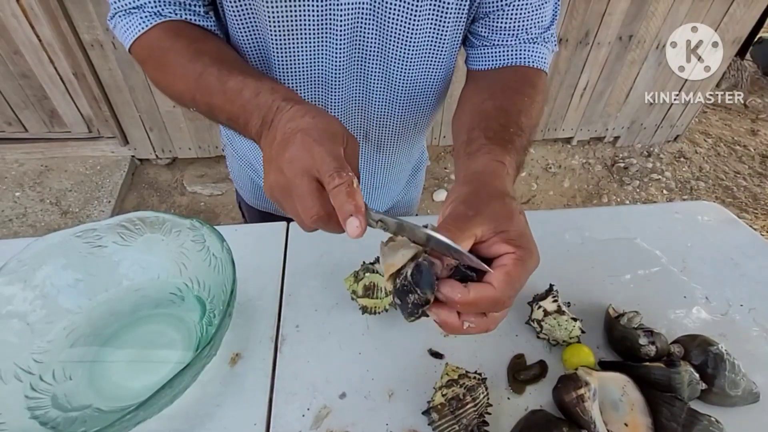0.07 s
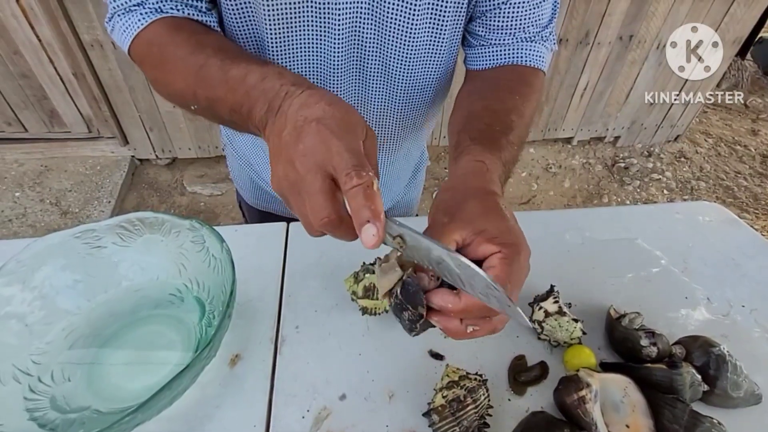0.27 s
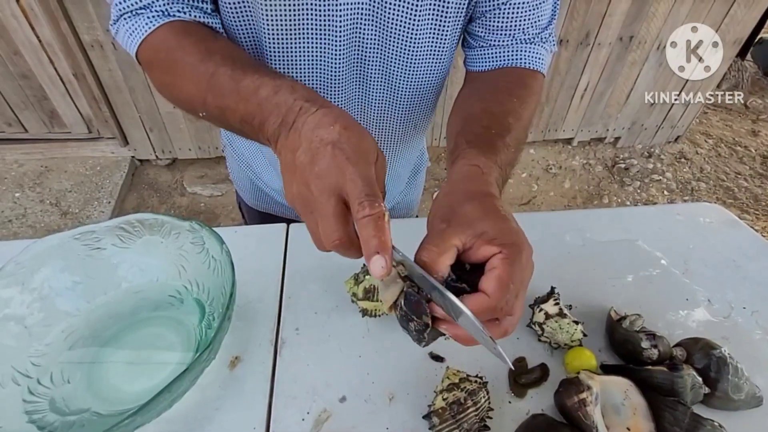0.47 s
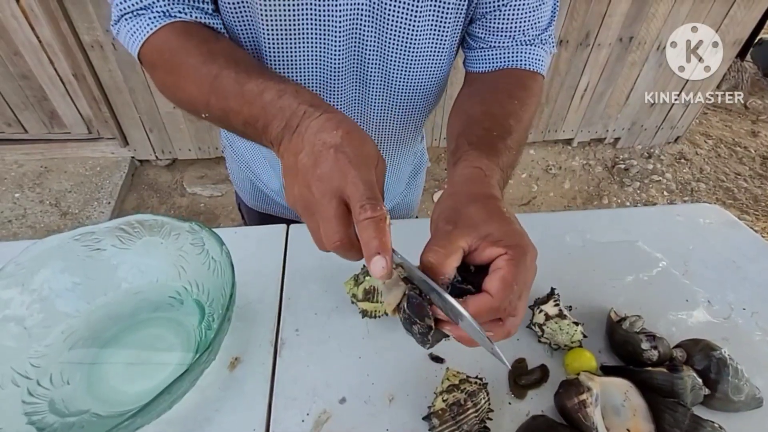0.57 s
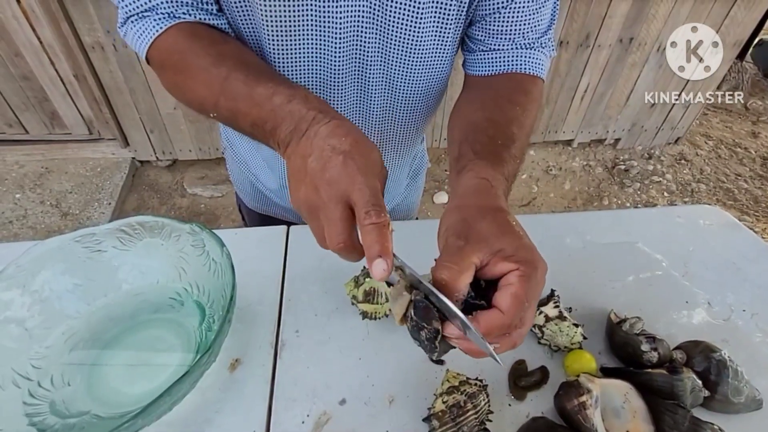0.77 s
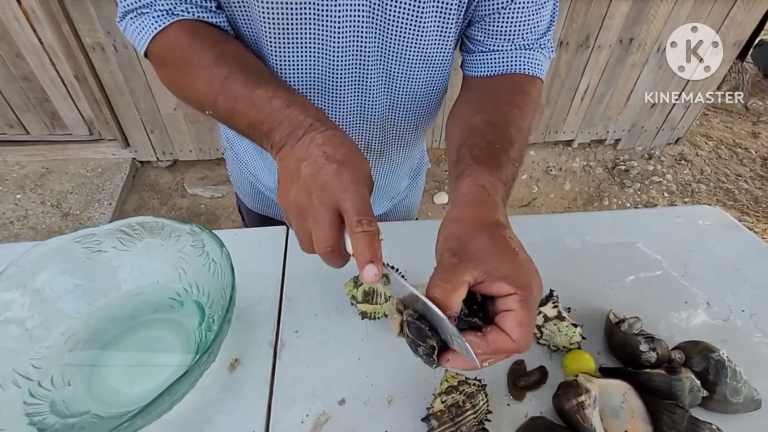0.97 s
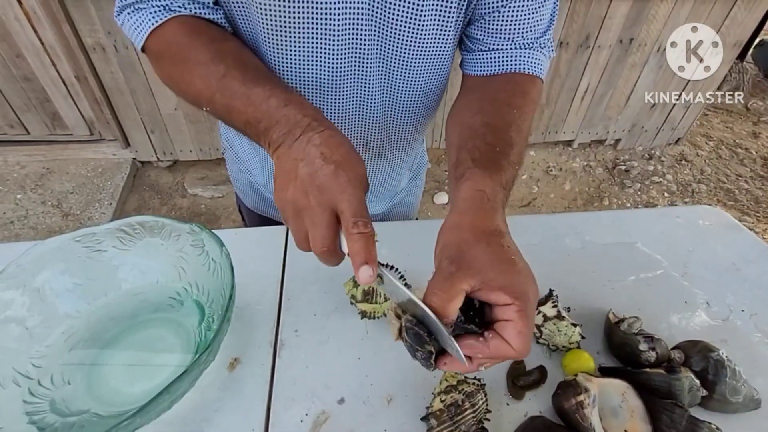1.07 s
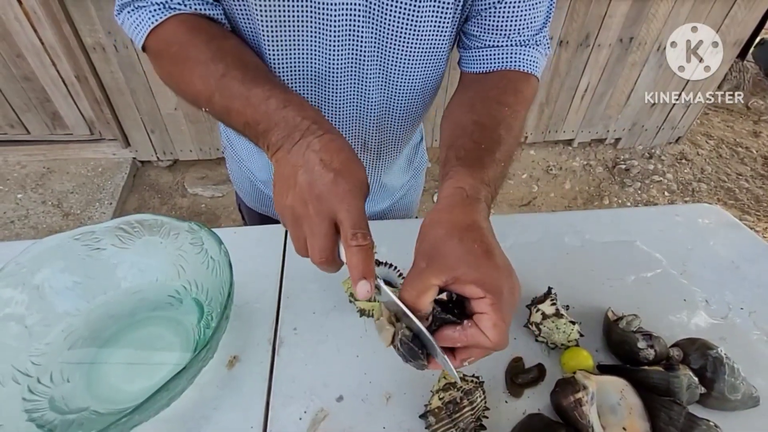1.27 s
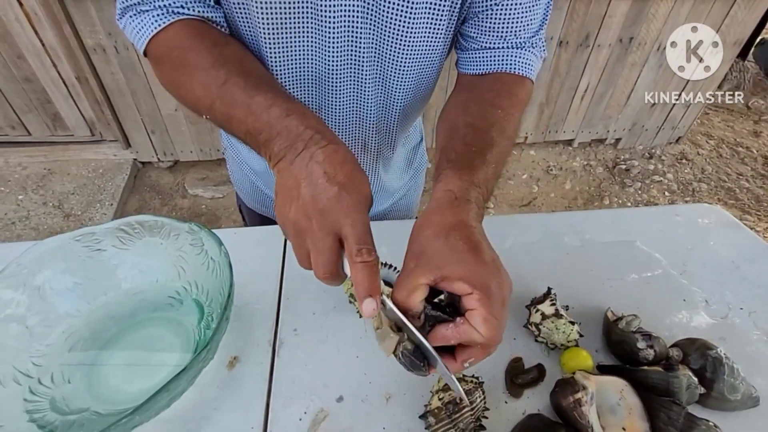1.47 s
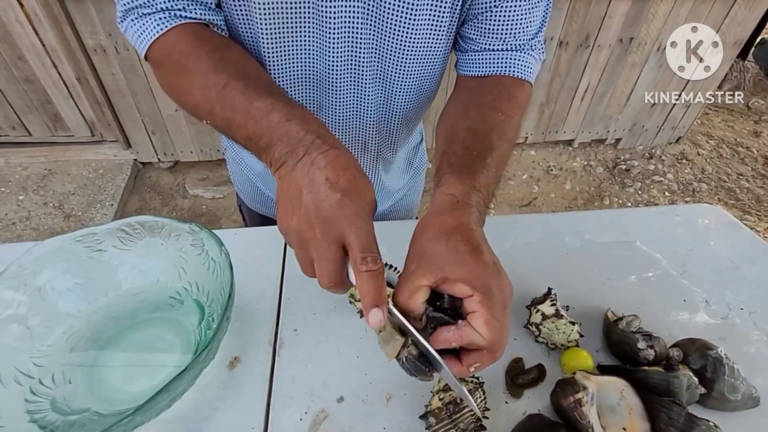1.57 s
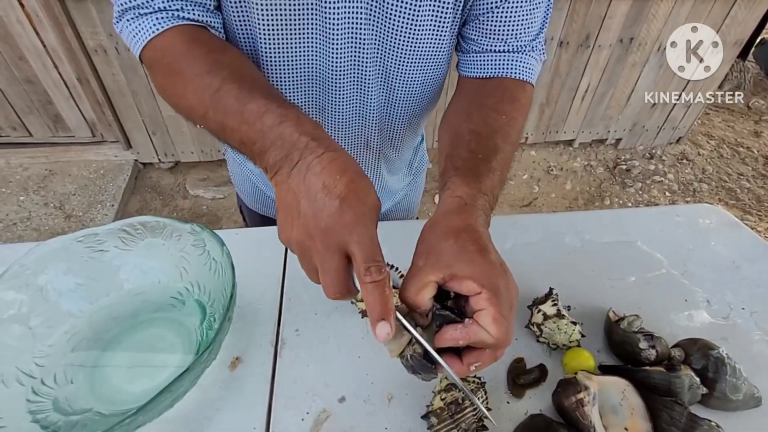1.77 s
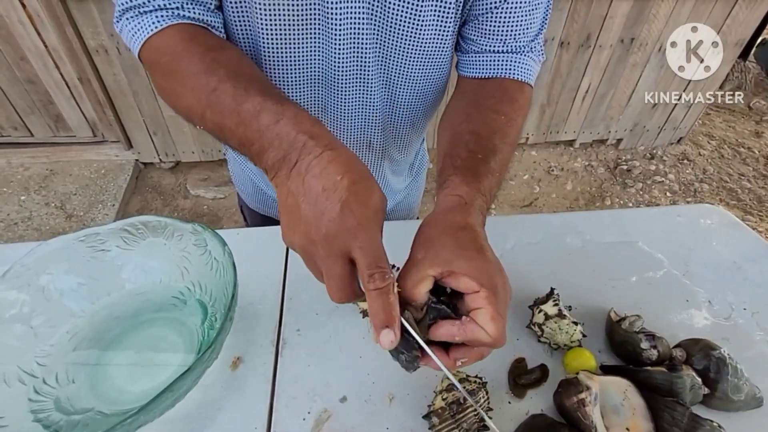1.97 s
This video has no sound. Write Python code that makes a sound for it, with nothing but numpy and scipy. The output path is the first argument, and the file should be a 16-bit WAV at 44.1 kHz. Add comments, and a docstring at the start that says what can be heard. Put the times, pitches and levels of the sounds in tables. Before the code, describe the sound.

A knife scrapes wet flesh in a shell with tiny crackles, then a sharp double snap near the end; two distant shovel-like gritty strokes, low wind thumps mainly on the right, quiet open yard.

```python
"""A knife picks at a cooked shellfish outdoors: noise bursts ring shell resonances, with one sharp double snap.
Further off, two gritty noise strokes, probably a shovel biting into sand, are each followed by softer spills.
Smoothed-out rumble and short suction pulses are wind on the microphone, mostly at its right port.
A small bird chirps three gliding tones and faint dull knocks sound, over the steady noise of a quiet yard."""
import sys
import numpy as np
from scipy import signal
from scipy.fft import rfft, irfft
from scipy.io import wavfile
from scipy.ndimage import uniform_filter1d

SR = 44100
rng = np.random.default_rng(int(sys.argv[2]) if len(sys.argv) > 2 else 0)


def unload_wav(signal):
    """Save mono or channel-first audio to the path in sys.argv[1] as 16-bit WAV at rate SR, clipped to [-1, 1]."""
    wavfile.write(
        sys.argv[1],
        SR,
        np.round(np.clip(np.atleast_2d(signal).T, -1, 1) * 32767).astype(np.int16),
    )


N = 88905
T = np.arange(N) / SR  # time, s
HZ = np.maximum(np.fft.rfftfreq(N, 1 / SR), 1)  # frequency of each spectrum bin


def amp(db):
    """Decibels to gain."""
    return 10 ** (np.asarray(db) / 20)


def unit(x):
    """Scale to rms 1 over all samples and ports."""
    return x / np.sqrt(np.mean(x ** 2))


def shape(x, response):
    """Filter by a frequency response."""
    return irfft(rfft(x) * response, N)


def colour(points):
    """Response drawn through (freq_hz, gain_db) points, on a log frequency axis."""
    freq_hz, gain_db = np.array(points, float).T
    return amp(np.interp(np.log(HZ), np.log(freq_hz), gain_db))


def resonances(rows):
    """Response of parallel resonators (pitch_hz, width_hz, level_db), scaled together to unit power."""
    response = sum(amp(db) / (1 + 1j * (HZ ** 2 - pitch ** 2) / (HZ * width)) for pitch, width, db in rows)
    return response / np.sqrt(np.mean(abs(response) ** 2))


def low_cut(hz):
    """Steep high-pass response."""
    return 1 / np.sqrt(1 + (hz / HZ) ** 8)


def tilt(db_per_octave):
    """Treble slope pivoting at 2500 Hz, flat below 500 Hz."""
    return amp(db_per_octave * np.log2(np.maximum(HZ, 500) / 2500))


def grit(grain):
    """Dense tiny impacts, more uneven in size as grain rises, unrelated at the two ports."""
    impacts = rng.standard_normal((2, N))
    return unit(impacts * np.exp(grain * rng.standard_normal((2, N))))


def envelope(start, attack, hold, fall):
    """Linear attack, hold, exponential release."""
    release = np.exp(-np.maximum(T - start - attack - hold, 0) / fall)
    return np.clip((T - start) / attack, 0, 1) * release


FLUTTER_S = 0.018  # larger is slower


def flutter(db):
    """Quick random swings of level, of this rms in dB, different at each port."""
    swings = shape(rng.standard_normal((2, N)), np.exp(-(HZ * FLUTTER_S) ** 2))
    return amp(db * unit(swings))


# Resonances of the thin shell edge: pitch_hz, width_hz, level_db, left_minus_right_db
EDGE_MODES = [(4940, 380, -19, 13), (8090, 260, 1, 4.5), (11060, 320, 3, -13), (12100, 1300, 0, 6),
              (14100, 460, -10, -3)]


def edge_response():
    """Each resonance of the thin edge radiates more to one side."""
    ports = []
    for side in (1, -1):
        ports.append(resonances([(hz, width, db + side * lean_db / 2) for hz, width, db, lean_db in EDGE_MODES]))
    return np.array(ports)


# Runs of shell fractures: start_s, level_db, length_s, body_over_edge_db
CRACKLES = [(0.0215, -74, 0.015, 10), (0.0524, -49, 0.0072, -3.5), (0.066, -66, 0.0044, -1.5),
            (0.103, -60.5, 0.0043, -11), (.2345, -56, 0.0016, -27), (.617, -60, 0.0017, -21),
            (1.192, -70, 0.0021, -13), (1.2387, -52.5, 0.00053, -5), (1.69, -57, .007, -24),
            (1.696, -48, 0.0011, -28), (1.7728, -59, 0.0032, -4), (1.816, -30, 0.0023, -11),
            (1.819, -51, .003, 7), (1.8272, -52.5, 0.0017, 14), (1.877, -72, 0.012, 7.5),
            (1.9135, -62, 0.0023, -14), (1.9313, -67.5, 0.0056, -0.5), (1.9825, -59, .002, -19),
            (1.991, -62, 0.0063, -31)]
# Resonances of the shell body: pitch_hz, width_hz, level_db
BODY_MODES = [(596, 230, 4.5), (1840, 490, 6), (3250, 290, -1), (4340, 1000, -0.5), (6800, 2400, -1)]
# Spells of scraping in the flesh: start_s, end_s, level_over_flesh_db
SPELLS = [(0., 0.237, 8.5), (1.11, 1.308, 0), (1.727, 1.997, -4)]
# Tone of the wet flesh: freq_hz, gain_db
FLESH_COLOUR = [(300, 16), (900, -3.5), (2000, -3), (2800, -11), (4100, -8), (5300, -8), (8000, 0),
                (9300, -1.5), (11500, -2.5), (15500, -7.5)]
CRACKLE_FALL_SHARE = 0.61  # release time over run length
CRACKLE_GRAIN, CRACKLE_APART = 1, 2.06  # unevenness; per-port part against the shared part
CRACKLE_ROOM_DB, CRACKLE_ROOM_S = -24, 0.031  # short tail: level, decay time
FLESH_DB, FLESH_TICKS_PER_S = -78, 250


def knife():
    """Runs of tiny fractures ring the edge and body of the shell; wet flesh rubs and ticks in spells."""
    edge, body = np.zeros(N), np.zeros(N)
    for start, db, length, body_db in CRACKLES:
        push = amp(db) * envelope(start, length / 2, length / 2, length * CRACKLE_FALL_SHARE)
        edge += push
        body += push * amp(body_db)
    fractures = unit(grit(CRACKLE_GRAIN)[0] + CRACKLE_APART * grit(CRACKLE_GRAIN))
    shell_edge = shape(fractures * edge, edge_response() * low_cut(2700))
    shell_body = shape(fractures * body, resonances(BODY_MODES) * low_cut(350))

    ticks = (rng.random(N) < FLESH_TICKS_PER_S / SR) * rng.standard_normal((2, N))
    rub = grit(CRACKLE_GRAIN)
    effort = sum(amp(db) * envelope(start, 0.0042, end - start, 0.018) for start, end, db in SPELLS)
    flesh = unit(shape(0.47 * unit(ticks) + rub, colour(FLESH_COLOUR) * low_cut(350)))

    close = amp(FLESH_DB) * effort * flesh + shell_edge + shell_body
    # a decaying noise tail of unit energy
    tail = unit(rng.standard_normal((2, N)) * np.exp(-T / CRACKLE_ROOM_S)) / np.sqrt(N)
    return close + amp(CRACKLE_ROOM_DB) * shape(close, rfft(tail))


def rumble(points):
    """Noise of a given colour with its slow swings evened out."""
    noise = shape(rng.standard_normal(N), colour(points))
    power = uniform_filter1d(noise ** 2, int(.035 * SR))
    return noise / np.sqrt(power + 1e-18)


# Gust strength, before the offsets of each layer: time_s, gust_db
GUSTS = [(0.0, -42.5), (0.19, -35.5), (0.22, -55), (0.26, -46.5), (0.3, -75), (0.37, -40), (0.43, -51.5),
         (0.55, -52), (0.57, -34.5), (0.64, -55), (0.67, -39.5), (0.71, -53.5), (0.8, -42.5), (0.83, -59),
         (0.89, -43), (0.94, -59), (0.98, -40.5), (1.08, -70), (1.15, -66), (1.22, -25), (1.26, -35.5),
         (1.32, -33), (1.4, -60), (1.44, -40.5), (1.48, -69), (1.51, -28.5), (1.54, -24), (1.6, -34.5),
         (1.63, -24.5), (1.64, -23), (1.66, -40), (1.69, -20), (1.83, -36), (1.86, -47), (1.9, -37),
         (2.02, -64)]
# Tone of the low rumble: freq_hz, gain_db
WIND_COLOUR = [(20, -35), (40, -6.5), (60, 3), (90, -11.5), (130, -12), (200, -47), (300, -34), (600, -82),
               (1500, -81.5)]
# Tone of the rougher turbulence: freq_hz, gain_db
TURBULENCE_COLOUR = [(60, -37), (130, 11), (250, 0.5), (400, -16.5), (700, -26), (1500, -45.5), (4000, -80)]
WIND_DB = 5.5  # right rumble over the gust strength
LEE_DB, LEE_FOLLOW = -20, 0.63  # left rumble: offset, dB per dB of gust
TURBULENCE_DB, TURBULENCE_GROWTH = 1, 1.38  # offset, dB per dB of gust


def wind():
    """Gusts rumble on the right port and roughen when strong; the left port lies in the lee."""
    gust_db = np.interp(T, *np.array(GUSTS).T)
    right = amp(gust_db + WIND_DB) * rumble(WIND_COLOUR)
    right += amp(TURBULENCE_DB + TURBULENCE_GROWTH * gust_db) * rumble(TURBULENCE_COLOUR)
    left = amp(LEE_DB + LEE_FOLLOW * gust_db) * rumble(WIND_COLOUR)
    return np.array([left, right])


# Tone of the yard air: freq_hz, gain_db
YARD_COLOUR = [(130, 0.5), (250, 6.5), (400, -8), (600, -7), (1000, -11.5), (1400, -17), (2000, -16),
               (2600, -20), (3300, -18), (4050, -13), (5200, -25), (7800, -15.5), (9300, -22), (11500, -18),
               (15500, -39)]
YARD_DB, YARD_LEFT_DB = -70, 1.5  # base level, extra at the left port


def yard():
    """Faint even outdoor air: steady coloured noise, unrelated at the two ports."""
    air = unit(shape(rng.standard_normal((2, N)), colour(YARD_COLOUR) * low_cut(120)))
    return amp(YARD_DB) * air * amp([[YARD_LEFT_DB], [0]])


# Eddies hitting a port: time_s, pressure_db (before the bass cut), width_s, port (0 left, 1 right)
BUFFETS = [(.107, -20.5, 0.0049, 0), (0.114, -17.5, 0.0037, 1), (0.1526, -13.5, 0.0025, 1),
           (0.196, -28, 0.0026, 1), (0.566, -28, 0.0019, 1), (0.589, -22.5, 0.0069, 0),
           (.778, -40, 0.0019, 1), (0.874, -24.5, 0.0035, 1), (0.967, -18.5, 0.0073, 1),
           (1.2234, -15.5, 0.0018, 1), (1.538, -9.5, 0.0019, 1), (1.572, -11, 0.002, 1),
           (1.618, -11, 0.0014, 1), (1.6252, -9, 0.0027, 1), (1.64, -7.5, 0.0019, 1),
           (1.6932, 0, 0.0015, 1), (1.71, -9, 0.0018, 1)]
PORT_HZ, PORT_WIDTH_HZ = 59.3, 65.6  # corner and damping of the bass cut


def buffets():
    """Each eddy is a brief suction; the bass cut of the microphone makes it swing back."""
    pressure = np.zeros((2, N))
    for time, db, width, port in BUFFETS:
        pressure[int(round(port))] -= amp(db) / np.cosh(np.clip(2 * (T - time) / width, -50, 50))
    bass_cut = HZ ** 2 / (HZ ** 2 - PORT_HZ ** 2 - 1j * HZ * PORT_WIDTH_HZ)
    return shape(pressure, bass_cut)


# Chirp notes: start_s, length_s, start_hz, end_hz, peak_db (before the lean to the left)
CHIRPS = [(0.343, 0.03, 5030, 4800, -69), (0.367, .013, 4280, 4300, -67.5), (0.386, 0.045, 4030, 4300, -69)]
CHIRP_WAVER_HZ = 89  # rms pitch waver


def bird():
    """Three thin gliding sines of wavering pitch, slightly to the left."""
    notes = np.zeros(N)
    waver = CHIRP_WAVER_HZ * unit(uniform_filter1d(rng.standard_normal(N), size=40))
    for start, length, from_hz, to_hz, db in CHIRPS:
        progress = np.clip((T - start) / length, 0, 1)
        pitch_hz = from_hz + (to_hz - from_hz) * progress + waver
        notes += amp(db) * np.sin(np.pi * progress) * np.sin(2 * np.pi * np.cumsum(pitch_hz) / SR)
    return notes * amp([[2], [-2]])


# Strokes: start_s, level_db, attack_s, hold_s, fall_s, tilt_db_per_octave, blade_over_rasp_db, ring_db
STROKES = [(0.432, -39, 0.013, 0.023, 0.032, 0.4, -9, -41.5),
           (1.304, -43, 0.0044, .036, 0.025, -0.5, -3.5, -48)]
# Tone of the rasp: freq_hz, gain_db
STROKE_COLOUR = [(310, -9), (520, -2), (710, -3), (870, -6), (1090, -2.5), (1310, -12.5), (1650, 1.5),
                 (2400, 1), (2850, -6), (4400, -5), (5700, -10.5), (7600, -5.5), (9000, -13), (11000, -10),
                 (15500, -17.5)]
# Resonances of the blade, also heard in the spills: pitch_hz, width_hz, level_db
BLADE_MODES = [(2110, 120, -12), (1996, 56, -14.5), (2525, 26, -18.5)]
# Resonances of the hollow sound: pitch_hz, width_hz, level_db
HOLLOW_MODES = [(204, 89, -1), (288, 27, -3.5), (690, 52, -8)]
STROKE_GRAIN, STROKE_LOW_HZ = 0.69, 227  # unevenness, low cut (shared with the spills)
BLADE_APART, HOLLOW_DB = 1, -7  # per-port against shared grit; hollow level over rasp
ECHO_DB, ECHO_FALL_S = -20.5, 0.11
RING_HZ, RING_WIDTH_HZ, RING_FLUTTER_DB = 391, 6.1, 2  # note, blur by phase wander, rms level swing
RING_BUILD_S, RING_FALL_S = 0.027, 0.026


def strokes():
    """Grit rasps on a blade while a hollow note builds; a slower faint fade gives the echo of the yard."""
    out = np.zeros((2, N))
    for start, db, attack, hold, fall, tilt_db, blade_db, ring_db in STROKES:
        rasp_tone = colour(STROKE_COLOUR) * tilt(tilt_db) * low_cut(STROKE_LOW_HZ)
        rasp = unit(shape(grit(STROKE_GRAIN), rasp_tone))
        blade_grit = grit(STROKE_GRAIN)[0] + BLADE_APART * grit(STROKE_GRAIN)
        blade = unit(shape(blade_grit, resonances(BLADE_MODES) * low_cut(1450)))
        hollow = unit(shape(grit(STROKE_GRAIN), resonances(HOLLOW_MODES) * low_cut(150)))
        scrape = rasp + amp(blade_db) * blade + amp(HOLLOW_DB) * hollow
        # the echo adds in power to each envelope
        echo = amp(ECHO_DB) * envelope(start, 0.069, hold, ECHO_FALL_S)
        out += amp(db) * scrape * np.hypot(envelope(start, attack, hold, fall), echo)

        wander = np.cumsum(rng.standard_normal(N)) * np.sqrt(2 * np.pi * RING_WIDTH_HZ / SR)
        ring = unit(np.sin(2 * np.pi * RING_HZ * T + wander) * flutter(RING_FLUTTER_DB))
        out += amp(ring_db) * ring * np.hypot(envelope(start, RING_BUILD_S, hold, RING_FALL_S), echo)
    return out


# Spills: peak_s, level_db (before flutter), rise_s, fall_s, tilt_db_per_octave
SPILLS = [(.67, -65.5, 0.017, 0.11, 4.5), (0.729, -58, 0.049, 0.048, -1.5), (0.866, -64, 0.034, 0.075, -1),
          (1.44, -56.5, 0.029, 0.068, 1), (1.576, -48, 0.031, 0.043, 0.76), (1.8, -58, 0.047, 0.035, 3)]
# Tone of the sliding grains: freq_hz, gain_db
SPILL_COLOUR = [(300, 7.5), (650, 4), (1150, -4.5), (1650, 0.5), (2200, -1), (3000, -7.5), (4500, -10.5),
                (5700, -15.5), (7800, -13.5), (9500, -16.5), (11800, -14), (15500, -23.5)]
SPILL_GRAIN, SPILL_BLADE_DB, SPILL_FLUTTER_DB = 0.48, -14.5, 2  # unevenness, blade over grains, rms swing


def spills():
    """Loose grains slide unevenly off the blade in soft swells after each stroke."""
    out = np.zeros((2, N))
    for peak, db, rise, fall, tilt_db in SPILLS:
        swell = 1 / np.cosh((T - peak) / np.where(T < peak, rise, fall))
        grain_tone = colour(SPILL_COLOUR) * tilt(tilt_db) * low_cut(STROKE_LOW_HZ)
        grains = unit(shape(grit(SPILL_GRAIN), grain_tone))
        blade = unit(shape(grit(SPILL_GRAIN), resonances(BLADE_MODES) * low_cut(1300)))
        out += amp(db) * swell * (grains + amp(SPILL_BLADE_DB) * blade)
    return out * flutter(SPILL_FLUTTER_DB)


# Faint dull knocks, perhaps shells shifting on the table: start_s, level_db, pitch_hz
KNOCKS = [(1.02, -59.5, 375), (1.996, -69, 500)]
KNOCK_WIDTH_HZ, KNOCK_PUSH_S, KNOCK_FALL_S = 87, 0.0081, 0.03


def knocks():
    """Soft contacts: a swell of noise through one damped resonance, applied twice for a narrower tone."""
    out = np.zeros((2, N))
    for start, db, pitch_hz in KNOCKS:
        thud = unit(shape(grit(0), resonances([(pitch_hz, KNOCK_WIDTH_HZ, 0)]) ** 2))
        out += amp(db) * envelope(start, KNOCK_PUSH_S, 0, KNOCK_FALL_S) * thud
    return out


def scene():
    """All sources at the two ports."""
    return knife() + wind() + yard() + buffets() + bird() + strokes() + spills() + knocks()


TOP_HZ = 15550


def record(dry):
    """A steep low-pass removes the extreme treble."""
    return signal.sosfilt(signal.ellip(10, .2, 80, TOP_HZ, fs=SR, output="sos"), dry)


dry = scene()
out = record(dry)
unload_wav(out)
```